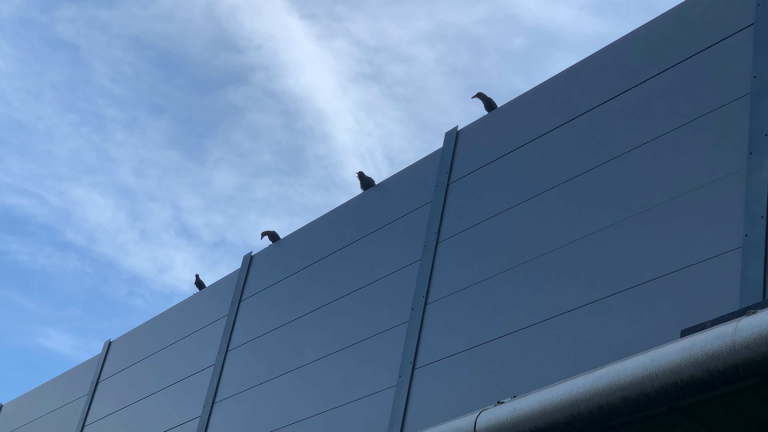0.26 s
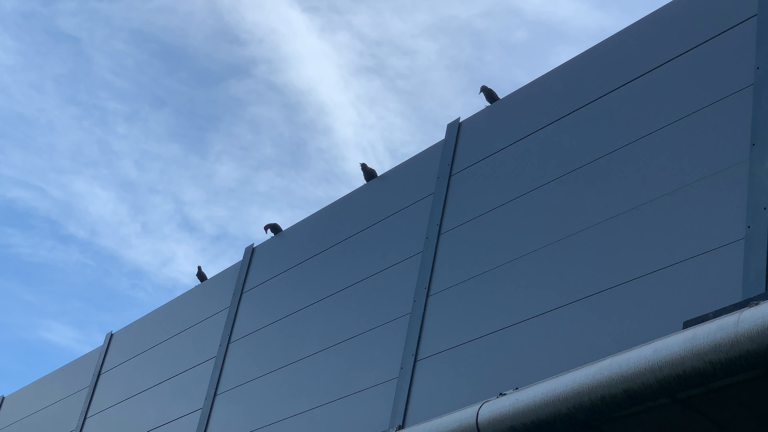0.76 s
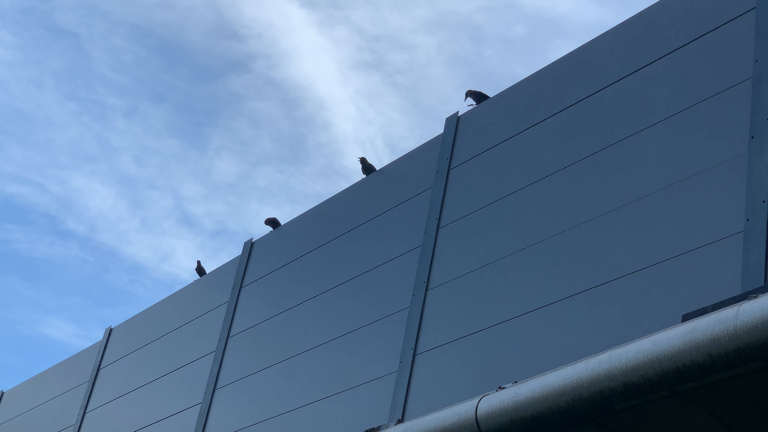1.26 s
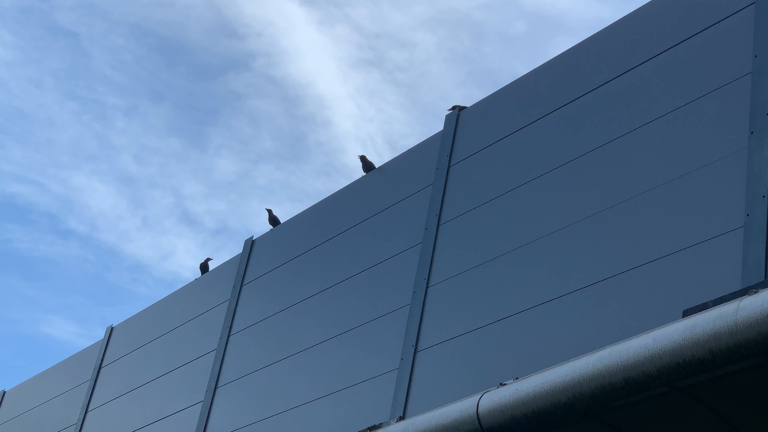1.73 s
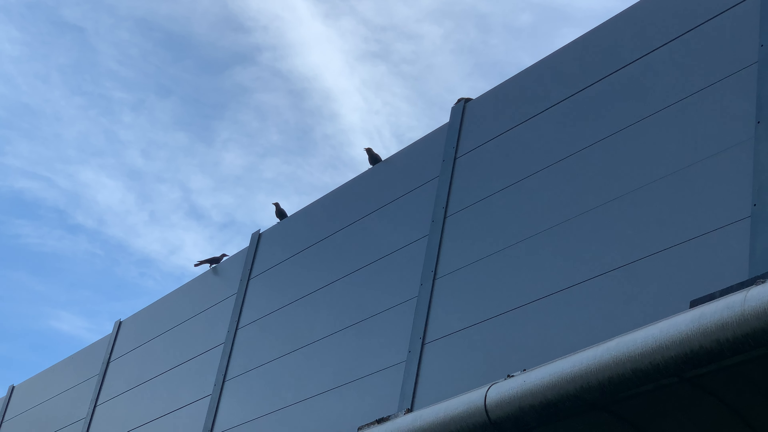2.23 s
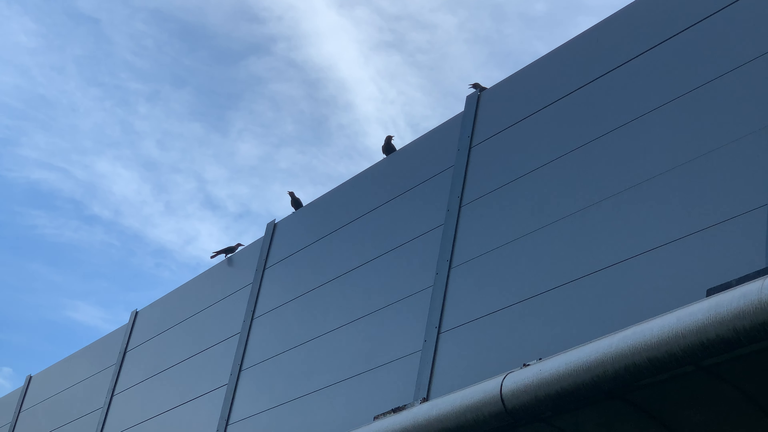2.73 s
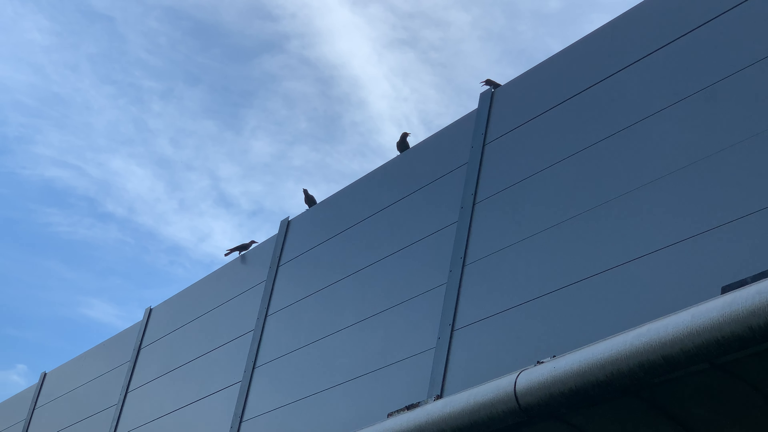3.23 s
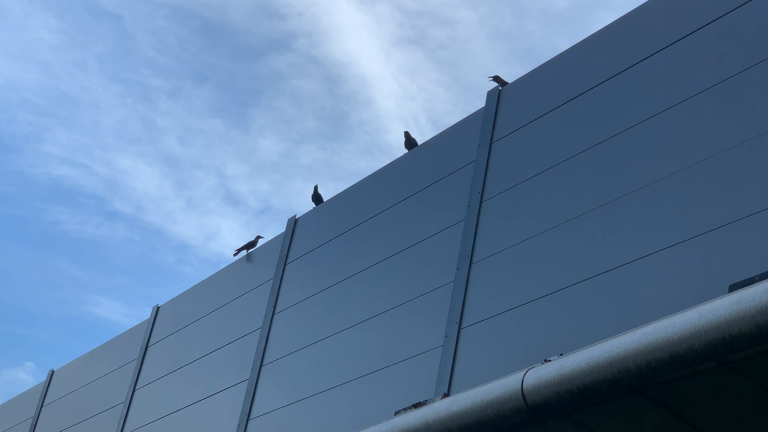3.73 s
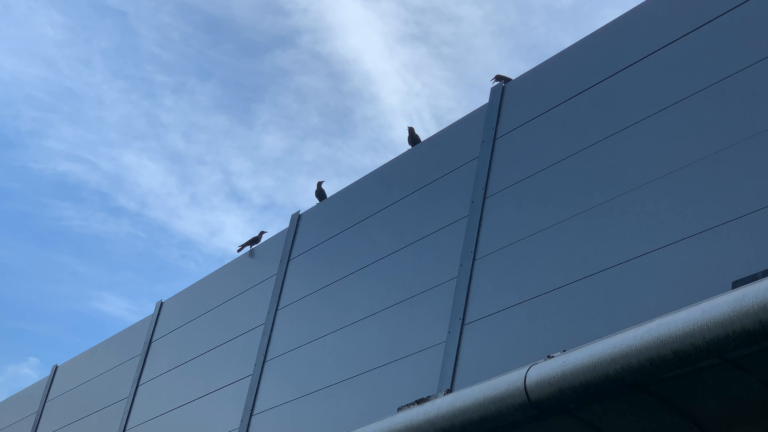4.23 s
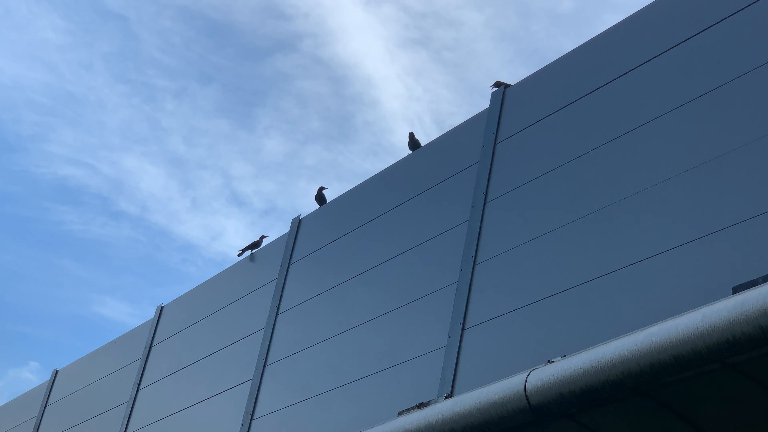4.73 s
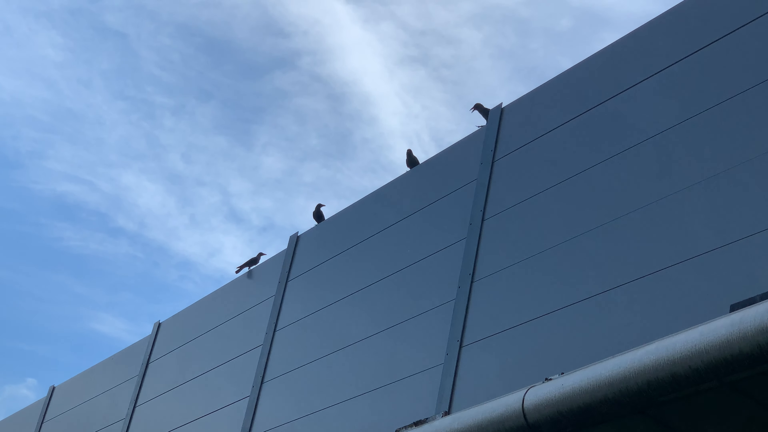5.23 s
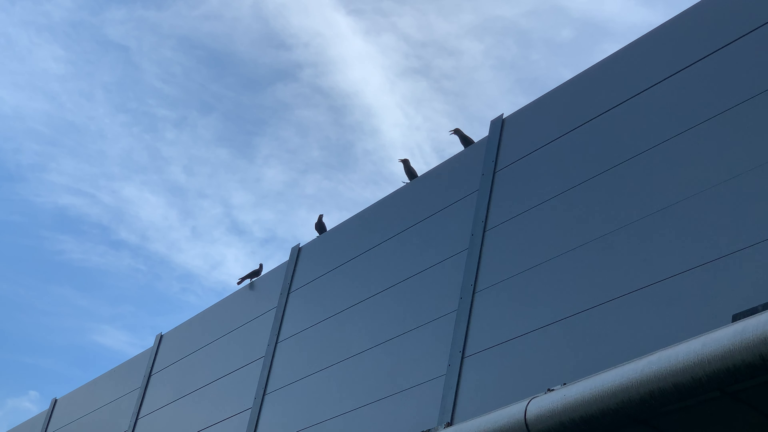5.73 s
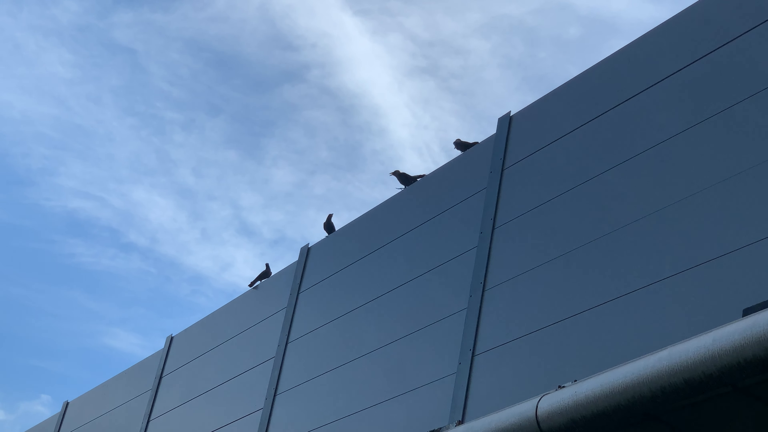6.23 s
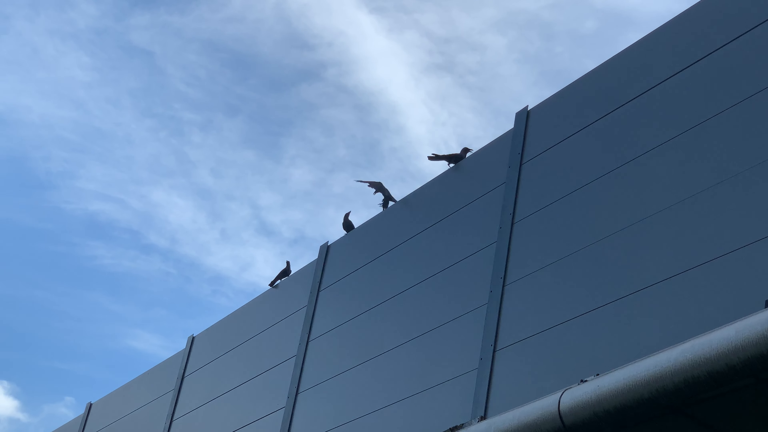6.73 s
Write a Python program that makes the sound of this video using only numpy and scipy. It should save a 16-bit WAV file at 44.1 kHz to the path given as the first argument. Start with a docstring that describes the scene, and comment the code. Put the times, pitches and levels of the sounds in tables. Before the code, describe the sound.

A steady low traffic rumble and a soft machinery drone fill the seven seconds, outdoors by a tall wall and road deck that return a faint, dull echo. A crow some way above, slightly right, gives a harsh, rattling caw at 0.1 s lasting under half a second, and another at 1.0 s. From 2.5 to 4.1 s comes a quick run of four caws almost joined together, the second and fourth strongest. A single caw follows at 5.5 s, and a weaker, duller one at 6.5 s. Wind presses on the hand-held stereo microphone, with a soft thump at 0.3 s and denser low buffets from 3.9 to 6 s. Tiny bright ticks sound close by at 0.1, 2.0 and 4.6-4.9 s, then more often from 5.9 s to the end. Around 6.2 s a small distant bird adds two faint, breathy chirps.

```python
"""Crows on a roadside wall

Crows caw from the top of a tall wall, some way above a hand-held stereo microphone. In each caw a syrinx
tone near 1 kHz carries sidebands of a slower, uneven rattle and rings the throat; breath hisses above.
Traffic rumbles behind the wall, machinery hums and wind buffets the microphone ports.
Tiny bright ticks sound close by and a small far bird gives two faint notes."""
import sys
import numpy as np
from scipy import signal
from scipy.fft import rfft, irfft
from scipy.io import wavfile
from scipy.ndimage import uniform_filter1d

SR = 44100
rng = np.random.default_rng(int(sys.argv[2]) if len(sys.argv) > 2 else 0)


def materialize(psi):
    """Save the field psi as 16-bit PCM at rate SR to the path in sys.argv[1].

    A 1-D psi becomes a single channel; in a 2-D psi each row is a channel.
    """
    bounded = np.clip(np.atleast_2d(psi).T, -1, 1)
    quanta = np.round(bounded * 32767).astype(np.int16)
    wavfile.write(sys.argv[1], SR, quanta)


N = 307377


def undb(db):
    """Amplitude of a level in dB."""
    return 10 ** (np.asarray(db) / 20)


def level(x, db):
    """Scale to an rms level."""
    return x * undb(db) / np.sqrt(np.mean(x ** 2))


def curve(table):
    """Breakpoints (s, value) as one value per sample."""
    return np.interp(np.arange(N) / SR, *np.transpose(table))


def along(table, hz):
    """Columns of a table over log frequency."""
    f, *columns = np.transpose(table)
    return [np.interp(np.log(hz + 1), np.log(f), c) for c in columns]


def ring(hz, centre_hz, width_hz):
    """Gain of a resonance, halved at width_hz / 2 off centre."""
    return 1 / (1 + (2 * (hz - centre_hz) / width_hz) ** 2)


def noise(size, centre_hz, width_hz, steep=1):
    """Noise through one resonance raised to the power steep, rms 1."""
    hz = np.arange(size // 2 + 1) * SR / size
    spectrum = rfft(rng.standard_normal(size)) * ring(hz, centre_hz, width_hz) ** steep
    return level(irfft(spectrum, size), 0)


def walk(rate, size=N):
    """Random levels held 1 / rate s and slewed twice; spread near 1."""
    k = int(SR / rate)
    held = np.repeat(rng.standard_normal(size // k + 1), k)
    return 1.38 * uniform_filter1d(uniform_filter1d(held, k), k)[:size]


def ports(pan_db, lead):
    """Left and right gains for a level step and a phase lead of the right port."""
    left = undb(pan_db / 2) * np.exp(-1j * lead / 2)
    right = undb(-pan_db / 2) * np.exp(1j * lead / 2)
    return np.array([left, right])


def caw(table, voice, cycles, rough_top, clear, beak_hz, partials_db):
    """Tone and its overtones with rattle sidebands, blurred by roughness; breath puffs once a rattle."""
    # hiss resonances: centre_hz, width_hz, relative level_db
    hiss_bands = [(3050, 830, -9), (8510, 3400, 3.5), (10350, 1660, -2)]
    glide_s = 0.0303  # the rattle turns its corners over this time
    throat_sag_rising, throat_skirt = 0.54, 0.023
    line_wander_db, layer_wander_db, breath_wander_db = 2, 1.5, 0.36
    tone_sag_db, breath_sag_db = 58, 38.5  # per unit of slack
    slack_odd_db, slack_tone_db = -9.5, -18  # when slack, odd steps from the tone weaken
    evening_per_slack = 15.4  # slack membranes leave the choice of partials to the throat
    weak_from_db, blur_per_db = -12, .035  # partials above the tone's neighbours and weaker are rougher
    scrape_per_slack = 2.6  # very slack membranes scrape
    beak_flutter_per_s = 900

    s, *columns = np.transpose(table)
    t = np.arange(int(s[0] * SR), int(s[-1] * SR)) / SR
    n = len(t)
    hz, throat_db = (np.interp(t, s, c) for c in columns)
    hz = uniform_filter1d(hz, int(glide_s * SR), mode="nearest")
    # slack at both ends: the membranes rattle less evenly and fill a wider band
    slack = 1 - hz / hz.max()
    (throat_hz, width_hz, end_sag, tone_db, beak_db, rasp_db, hiss_db, air_db,
     rasp_hz, beak_sag, beak_fade_db) = voice
    throat_sag = np.where(np.arange(n) < hz.argmax(), throat_sag_rising, end_sag)
    throat_hz = throat_hz * (1 - throat_sag * slack)
    rough = np.clip(rough_top + 1.5 * slack, 0, .92)
    turn = 2 * np.pi * np.cumsum(hz) / SR

    def gain(top_db, sag_db):
        """Layer gain that falls with slack and wanders."""
        return undb(top_db - sag_db * slack + layer_wander_db * walk(20.8, size=n))

    def fade(attack_s, release_s):
        """Straight fades at both ends of the caw."""
        return np.clip(np.minimum((t - t[0]) / attack_s, (t[-1] - t) / release_s), 0, 1)

    def lines(orders, gains, blurs):
        """Partials of the rattle; roughness hands each one's power to a fast random flutter."""
        out = 0
        for k, g, blur in zip(orders, gains, blurs):
            loose_share = rough + (1 - rough) * blur
            flutter = walk(110.2, size=n) + 1j * walk(108.8, size=n)
            envelope = np.sqrt(2 * (1 - loose_share)) + np.sqrt(loose_share) * flutter
            carrier = np.exp(1j * (k * turn + rng.uniform(0, 2 * np.pi)))
            out = out + g * np.real(envelope * carrier)
        return out / np.sqrt(sum(g ** 2 for g in gains))

    def slack_gain(k):
        """Gain the throat gives a partial k steps from the tone when the membranes are slack."""
        formant = throat_skirt + 4.6 * slack ** 2 + ring((cycles + k) * hz, throat_hz, width_hz)
        return undb(k % 2 * slack_odd_db) * formant + (k == 0) * undb(slack_tone_db)

    tone_breath = noise(n, 1170, 1030, steep=1.4)

    steps = np.arange(len(partials_db)) - 3  # rattle steps from the tone
    loose = np.clip(evening_per_slack * slack, 0, 1)
    gains = []
    for k, db in zip(steps, partials_db):
        own_gain = undb(db * (1 - loose) + line_wander_db * walk(12.8, size=n))
        gains.append(own_gain * slack_gain(k) ** loose)
    blurs = np.clip((weak_from_db - np.array(partials_db)) * blur_per_db, 0, .8) * (steps > 2)
    throat = lines(cycles + steps, gains, blurs)

    puff = level(1 + 0.3 * np.cos(turn) + 0.069 * np.cos(2 * turn), 0)
    scrape_share = np.clip((scrape_per_slack * slack) ** 2, 0, .6)
    scrape = puff * noise(n, 1500., 1100., steep=2)
    throat = np.sqrt(1 - scrape_share) * throat + np.sqrt(scrape_share) * scrape

    def resonance(centre_hz, lines_width_hz, breath, share):
        """A resonance picks out the partials that pass through it; breath fills the rest, all when slack."""
        near = int(np.max(centre_hz) / hz.max()) + np.arange(-4, 14)
        picked = lines(near, [ring(k * hz, centre_hz, lines_width_hz) for k in near], 0 * near)
        share = np.clip(share * (1 - 5 * slack), 0, 1)
        return np.sqrt(share) * picked + np.sqrt(1 - share) * puff * breath

    beak_hz = beak_hz * (1 - beak_sag * slack)
    flutter = walk(beak_flutter_per_s, size=n) + 1j * walk(beak_flutter_per_s, size=n)
    beak_breath = np.real(flutter * np.exp(2j * np.pi * np.cumsum(beak_hz) / SR))
    beak = resonance(beak_hz, 260., beak_breath, clear)

    hiss = puff * level(sum(undb(d) * noise(n, f, w, steep=2) for f, w, d in hiss_bands), 0)
    rasp = resonance(rasp_hz, 700., noise(n, rasp_hz, 1500., steep=1.1), .3)
    air = puff * noise(n, 13360, 5700, steep=5)
    breath = gain(rasp_db, breath_sag_db) * rasp
    breath = breath + gain(hiss_db, breath_sag_db) * hiss
    breath = breath + gain(air_db, breath_sag_db) * air
    breath = breath * undb(breath_wander_db * walk(18.5, size=n)) * fade(0.0065, 0.029)

    voiced = undb(throat_db) * throat + gain(tone_db, tone_sag_db) * tone_breath
    voiced = voiced + gain(beak_db, beak_fade_db) * beak
    return fade(0.0031, 0.025) * (voiced + breath)


def echo():
    """Stereo response of walls and road deck: a late dull tail and a brighter one from close surfaces."""
    t60_s, tail_db, start_s, top_hz = 1.77, -24.98, 0.029, 2490
    near_t60_s, near_db = .6, -19
    t = np.arange(SR) / SR
    tail = [[1, 1.0], [1, -0.84]] @ rng.standard_normal((2, SR))
    tail = tail * undb(-60 * t / t60_s) * np.clip(t / start_s, 0, 1) ** 2
    tail = signal.sosfilt(signal.butter(4, top_hz, fs=SR, output="sos"), tail)
    colour = 0.34 + ring(np.arange(SR // 2 + 1), 2060, 560)
    tail = irfft(rfft(tail) * colour, SR)
    tail = tail * undb(tail_db) / np.sqrt(np.sum(tail ** 2) / 2)
    near = rng.standard_normal((2, SR)) * undb(-60 * t / near_t60_s)
    return tail + near * undb(near_db) / np.sqrt(np.sum(near ** 2) / 2)


def crows():
    """All caws, direct through the two ports, then scattered back by walls and road deck."""
    # one curve per caw: time_s, rattle_hz, throat_level_db
    caw_curves = [
        [(0.11, 62, -51), (0.152, 73.8, -40), (0.205, 83.1, -32.5), (0.252, 86.6, -34), (0.366, 86.9, -33.5),
         (0.416, 84.5, -36), (0.45, 83.3, -31), (0.49, 79.4, -35), (0.53, 70, -42), (0.55, 61.9, -55)],
        [(0.96, 62.4, -49), (1.008, 77.7, -35.5), (1.04, 84.1, -34.5), (1.08, 84.3, -36), (1.198, 85.56, -35),
         (1.29, 83.4, -34), (1.344, 77.7, -37), (1.39, 67.2, -50)],
        [(2.485, 56.7, -48), (2.52, 69.7, -43.5), (2.572, 80.7, -36), (2.624, 80.6, -36), (2.714, 77.1, -39),
         (2.775, 75.6, -33)],
        [(2.74, 75.4, -35), (2.755, 79.9, -34), (2.782, 82.2, -28), (2.824, 84.06, -29.5), (2.944, 82.94, -30),
         (3.032, 81.94, -28.5), (3.068, 79.4, -34), (3.135, 64.9, -44)],
        [(3.11, 70.15, -43), (3.148, 73.5, -39.5), (3.192, 83.35, -37), (3.248, 84.3, -37),
         (3.298, 84.05, -36.5), (3.386, 75.5, -37), (3.428, 68.9, -41), (3.485, 57, -51)],
        [(3.549, 66.8, -49), (3.562, 72, -39), (3.585, 78.5, -36.5), (3.622, 81.3, -30), (3.668, 83.3, -30.5),
         (3.778, 84.44, -31.5), (3.928, 81.05, -29.5), (3.974, 78.4, -37), (4.014, 73.7, -39), (4.085, 58, -52)],
        [(5.49, 58.3, -48), (5.52, 72, -39), (5.572, 79.6, -35), (5.624, 85.6, -33), (5.676, 84.1, -32),
         (5.725, 82.2, -34), (5.778, 78, -35.5), (5.822, 73.6, -42), (5.89, 58, -42.5)],
        [(6.48, 69.4, -51), (6.52, 81.1, -42), (6.57, 88, -41), (6.62, 91, -40.5), (6.67, 90.2, -39),
         (6.724, 83.4, -43.5), (6.77, 69, -49)],
    ]
    # voice at the top of each caw: throat_hz, throat_width_hz, throat_end_sag (x slack), tone_breath_db,
    # beak_db, rasp_db, hiss_db, air_db, rasp_hz, beak_sag (x slack), beak_fade (dB per slack)
    voices = [(1970, 390, .4, -56, -48, -48, -43, -59, 6100, .3, 20),
              (1930, 440, .3, -55, -47.5, -49, -44, -62.5, 6100, .2, 37),
              (1900, 430, .9, -54, -53.5, -51.5, -49.5, -72, 5500, .6, 43),
              (1940, 300, .6, -55, -52.5, -48.5, -45.5, -66, 6350, .3, 32),
              (2030, 270, .55, -55, -50, -51, -49.5, -73, 6000, .7, 60),
              (1940, 310, .4, -53, -51.5, -44.5, -44.5, -61, 6150, .4, 38),
              (2015, 260, .65, -52.5, -49, -51.5, -48.5, -71.5, 6000, .6, 110),
              (1740, 430, .6, -58, -64, -58, -56, -73, 6100, .8, 30)]
    # per caw: tone cycles in one rattle
    tone_cycles = [13, 13, 13, 13, 12, 13, 12, 10]
    # per caw: roughness at the top (0-1)
    roughness = [.06, .08, .15, .05, .17, .08, .06, .16]
    # per caw: share of the beak band that is clear lines (0-1)
    beak_clear = [.4, .7, .7, .6, .8, .5, .8, .4]
    # per caw: beak resonance_hz
    beak_centres = [4450, 4360, 3970, 4300, 4070, 4360, 4080, 3930]
    # per caw: relative partial levels_db, from 3 rattle steps under the tone upward
    partial_levels = [
        [-28, -16, -20, -5.5, -21, -18, -28, -16, -21, -18, -18, -15, 0, 2, -14.5, -7, -21, -23],
        [-27, -15, -25, -7, -14, -17, -24, -26, -19, -26, -15, -20, 0, -6, -9, -9, -13, -37],
        [-25, -15, -20, -9, -29, -19, -15, -19, -14, -30, -33, -13, -10, -5, -1, 0.5, -10, -34],
        [-33, -20.5, -20, -16.5, -21, -20.5, -26, -34, -22, -34, -23, -16, -8, -2, -4, -3.5, -19, -21],
        [-30, -30, -20, -3.5, -12, -10, -16, -28, -19, -22, -23, -22, -16, -3, 3, 2, -6, -16],
        [-28, -17, -18, -16, -12, -24, -20, -21, -28, -20, -19, -10, -5, 1, -8, -5, -21, -17],
        [-37, -31, -21, -12, -25, -27, -34, -34, -35, -33, -24, -38, -16, -13, -7, 0, -8, -25],
        [-23, -17, -12, -13, -25, -27, -21, -18, -17, -23, -22, -11, -17, -1.5, -4, -15, -25, -21],
    ]
    # crow at the two ports: hz, left_minus_right_db, right_lead_rad
    crow_ports = [(500, -2, -.1), (1000, -2.5, -.3), (2000, -3.5, -.65), (4200, -3, -1.4), (6200, -6, -2.5),
                  (7900, 0, -1.9), (9000, 0, -.2), (10000, 0, .9), (13000, 0, 5.2)]

    dry = np.zeros(N)
    settings = zip(caw_curves, voices, tone_cycles, roughness, beak_clear, beak_centres, partial_levels)
    for table, *voice in settings:
        one = caw(table, *voice)
        start = int(table[0][0] * SR)
        dry[start:start + len(one)] += one
    pan_db, lead = along(crow_ports, np.arange(N // 2 + 1) * SR / N)
    direct = irfft(rfft(dry) * ports(pan_db, lead), N)
    return direct + signal.fftconvolve(dry[None], echo(), axes=1)[:, :N]


def wind():
    """Gusts press on the ports, mostly alike; the hardest arrive as falling thumps."""
    # gusts: time_s, level_db
    gusts = [(0.0, -43.5), (0.4, -40), (0.85, -41.5), (1.2, -39.5), (1.7, -38), (2.0, -41.5), (2.3, -44),
             (2.45, -40), (3.1, -38), (3.55, -42), (3.95, -32), (4.2, -38), (4.45, -30.5), (4.9, -34),
             (5.2, -34), (5.45, -28), (5.68, -37.5), (5.97, -34.5), (6.3, -36), (6.97, -41)]
    # thumps: start_s, level_db before decay, final pitch_hz
    thumps = [(0.283, -17.5, 70), (3.928, -20.5, 100.9), (4.245, -20.5, 107), (4.319, -13, 70.4),
              (4.407, -13, 79), (4.448, -15.5, 80.4), (4.656, -20, 118), (4.757, -17, 77), (4.92, -22, 93),
              (5.039, -28, 136), (5.274, -17.5, 126), (5.657, -24.5, 144), (5.778, -20, 128),
              (5.911, -21, 80.2)]
    buffet_db, buffets_per_s, thump_t60_s = 2.5, 22, 0.07

    mid, side = (noise(N, 55.7, 121.0) * undb(1.1 * walk(25)) for _ in range(2))
    gust_gain = undb(curve(gusts) + buffet_db * walk(buffets_per_s))
    out = gust_gain * (mid + 0.38 * side * np.array([[1], [-1]]))
    t = np.arange(SR // 10) / SR
    for s, db, hz in thumps:
        glide_hz = hz * (1 + 2.2 * np.exp(-t / 0.0031))
        envelope = undb(db - 60 * t / thump_t60_s) * (1 - np.exp(-t / 0.0015)) ** 2
        envelope = envelope * np.clip((t[-1] - t) / .03, 0, 1)
        thump = envelope * np.sin(2 * np.pi * np.cumsum(glide_hz) / SR)
        start = int(s * SR)
        out[:, start:start + len(t)] += thump * [[1.05], [.95]]
    return out


def road():
    """Traffic noise in overlapping octave bands that swell together and flicker alone."""
    # road at the two ports: hz, likeness (0-1), left_minus_right_db, right_lead_rad
    road_ports = [(100, .97, -.5, 0), (250, .5, -2, 0), (350, .65, -1.5, 0), (450, .7, 0, -3.1),
                  (700, .6, 2, -3.1), (1100, .3, 1, -3.1), (1900, .6, 0, -5), (3400, .6, 0, -9.2),
                  (4300, .4, -1, -12), (5500, .55, -3, -15.5), (7000, .2, -1, -15.7), (9000, .97, 0, -12.6),
                  (11000, .9, 0, -9.4)]
    # spectrum: hz, relative density (dB per Hz)
    spectrum = [(25, -105), (60, -64.5), (150, -66), (250, -75), (500, -76.5), (900, -77), (1850, -84.5),
                (2600, -87), (4200, -90), (5500, -99), (8800, -106), (9900, -89.5), (10750, -99),
                (11000, -150)]
    # overall level: time_s, level_db
    loudness = [(0.0, -38.5), (0.29, -37.5), (0.78, -38.5), (1.22, -38), (1.49, -38.5), (3.88, -39),
                (4.21, -39), (5.88, -38.5), (6.97, -38.5)]

    hz = np.arange(N // 2 + 1) * SR / N
    like, pan_db, lead = along(road_ports, hz)
    like = np.clip(like, 0, 1)
    shared, own = rfft(rng.standard_normal((2, N)))
    left = np.sqrt(1 + like) * shared + np.sqrt(1 - like) * own
    right = np.sqrt(1 + like) * shared - np.sqrt(1 - like) * own
    pair = np.array([left, right]) * ports(pan_db, lead) * undb(along(spectrum, hz)[0])
    out, swell = 0, walk(1.506)
    for octave in np.arange(4, 14.5):
        share = np.clip(1 - abs(np.log2(hz + 1) - octave), 0, 1)
        out = out + undb(0.35 * swell + 1.76 * walk(6)) * irfft(pair * share, N)
    return level(out, 0) * undb(curve(loudness))


def hums():
    """Machinery: narrow noise bands as wavering tones, and one nearly steady sine drone."""
    # hums: centre_hz, width_hz, left level_db, right gain against left (negative = inverted)
    hum_bands = [(60.9, 11, -42, 1.19), (135.1, 6.9, -46.5, 1.3), (270.5, 3.7, -56.5, 1.1),
                 (391.2, 8.7, -62, 0.42), (441, 38, -50.5, -1.37), (1830, 100, -55.5, 0.25)]
    drone_hz, drone_db = 314.4, -48
    drone_gain = np.sqrt(2) * undb(drone_db + .8 * walk(9))
    drone = drone_gain * np.sin(2 * np.pi * np.cumsum(drone_hz + .4 * walk(6)) / SR)
    out = drone * [[.85], [1.1]]
    for hz, width_hz, db, right_gain in hum_bands:
        out = out + undb(db) * noise(N, hz, width_hz) * np.array([[1], [right_gain]])
    return out


def ticks():
    """Tiny bright ticks close by, as of fingers on the case: decaying bursts of treble noise."""
    # ticks: start_s, top_treble_db, lower_treble_db (both before the envelope)
    tick_table = [(0.102, -63, -55), (1.9794, -60, -66), (4.579, -80, -56), (4.8509, -60, -62),
                  (5.8856, -44, -56), (6.0576, -65, -71), (6.2352, -55, -63), (6.4253, -56, -71),
                  (6.912, -43, -68)]
    out, t = np.zeros(N), np.arange(SR // 25) / SR
    envelope = undb(-60 * t / 0.043) * (1 - np.exp(-t / 0.0024))
    for s, top_db, low_db in tick_table:
        tick = undb(top_db) * noise(len(t), 13400, 2300.0, steep=5.1)
        tick = tick + undb(low_db) * noise(len(t), 7500., 3000.)
        start = int(s * SR)
        out[start:start + len(t)] += tick * envelope
    return out


def songbird():
    """Short breathy notes of a small far bird: narrow noise under a smooth hump, blurred by distance."""
    # notes: start_s, length_s, pitch_hz, level_db before the hump
    chirps = [(6.216, 0.053, 5940, -59), (6.243, 0.067, 4660, -56)]
    out = np.zeros(N)
    for s, length_s, hz, db in chirps:
        n, start = int(length_s * SR), int(s * SR)
        out[start:start + n] += undb(db) * noise(n, hz, 253.0) * np.hanning(n)
    return out


def scene():
    """Sum of all sources, left and right."""
    return crows() + songbird() + road() + hums() + wind() + ticks()


def record(dry):
    """The microphone loses the deepest bass and the top is cut."""
    bass_cut_hz, top_hz = 40., 15600
    dry = signal.sosfilt(signal.butter(3, bass_cut_hz, "high", fs=SR, output="sos"), dry)
    return signal.sosfilt(signal.ellip(12, .2, 70, top_hz, fs=SR, output="sos"), dry)


dry = scene()
out = record(dry)
materialize(out)
```